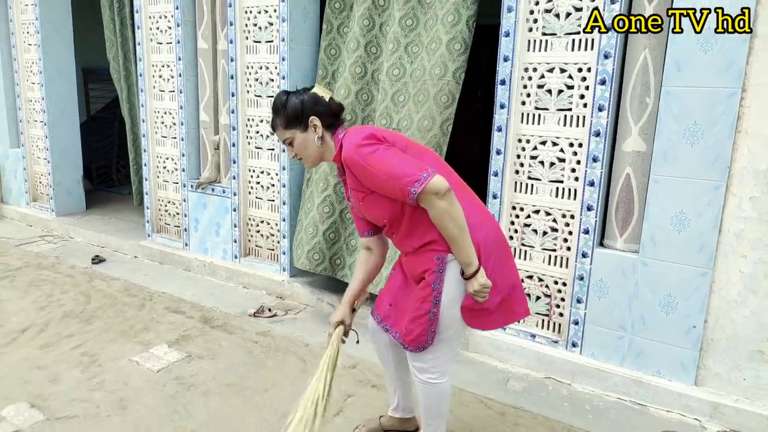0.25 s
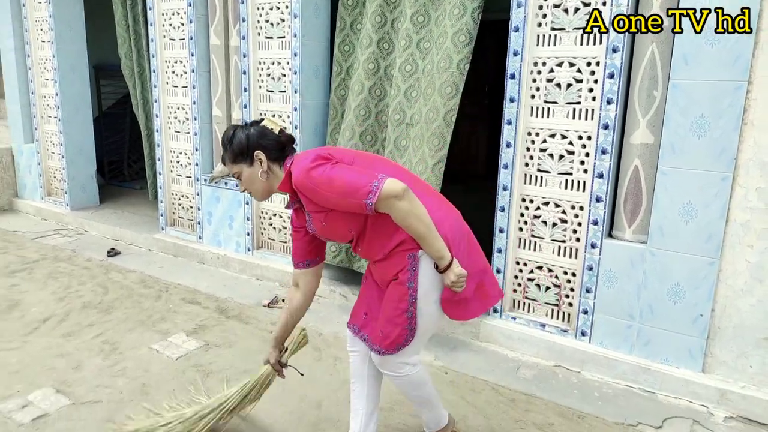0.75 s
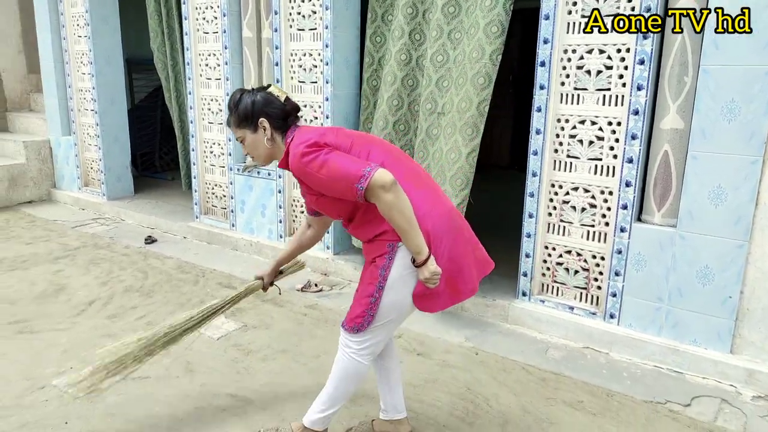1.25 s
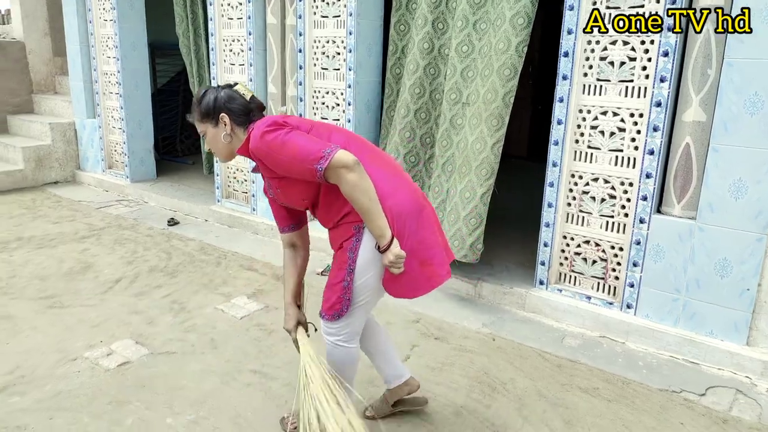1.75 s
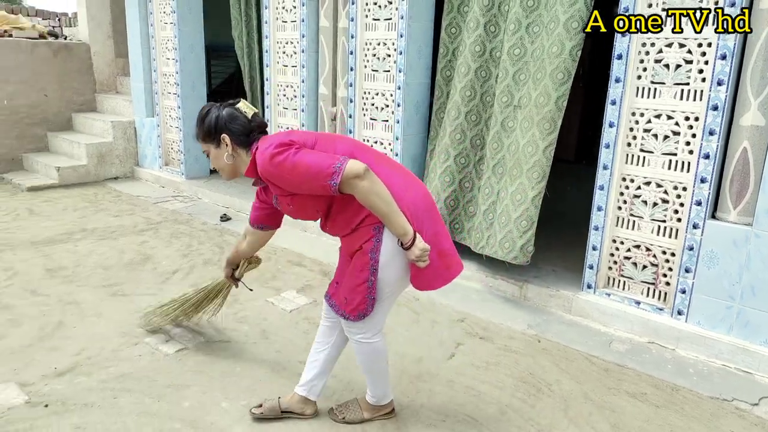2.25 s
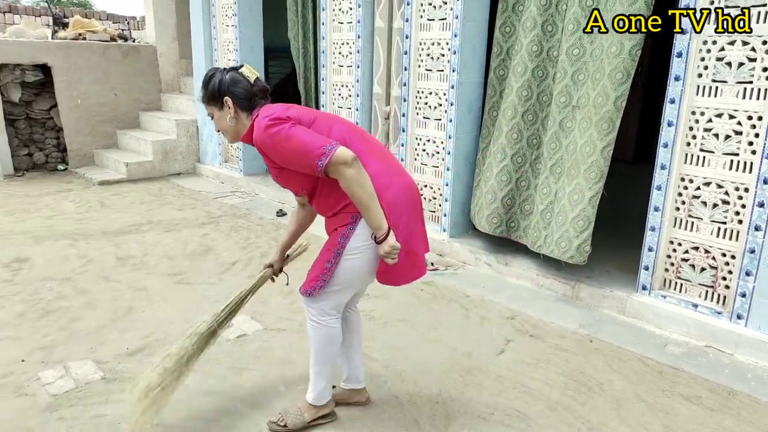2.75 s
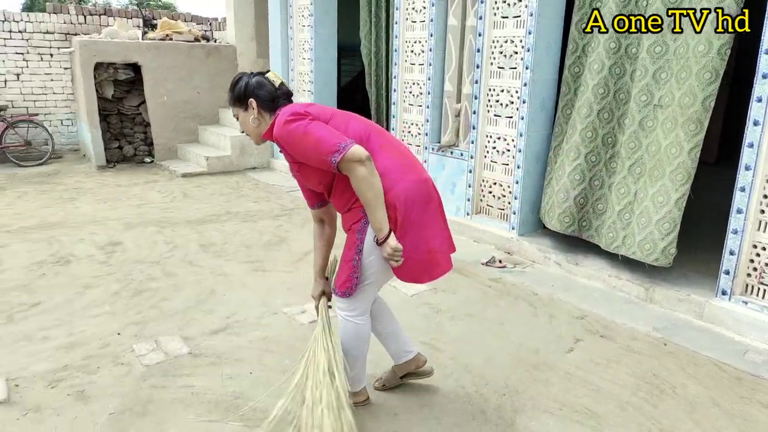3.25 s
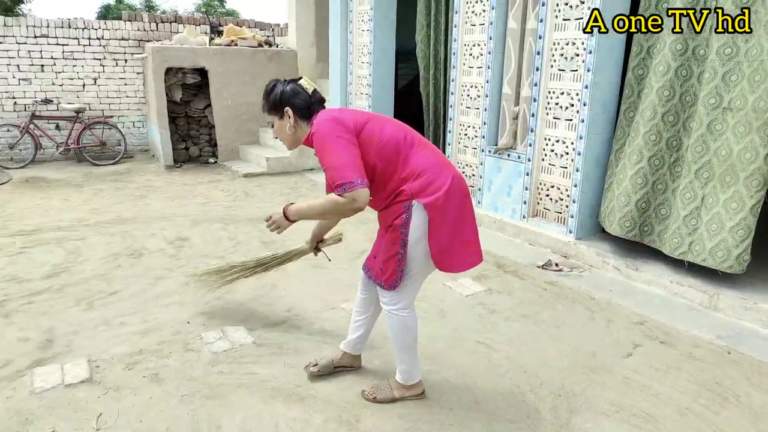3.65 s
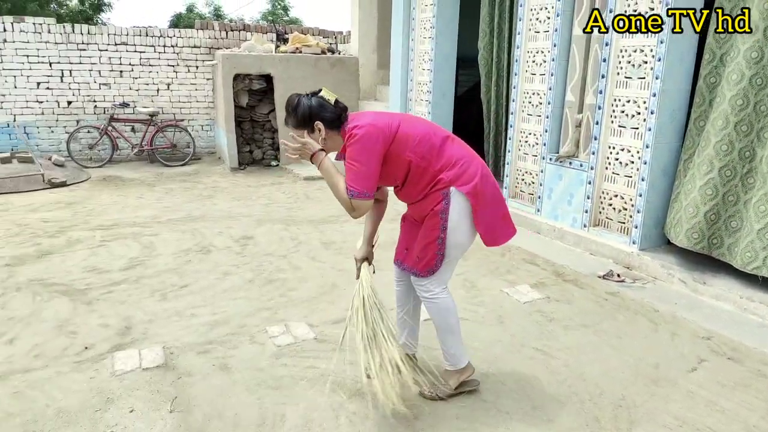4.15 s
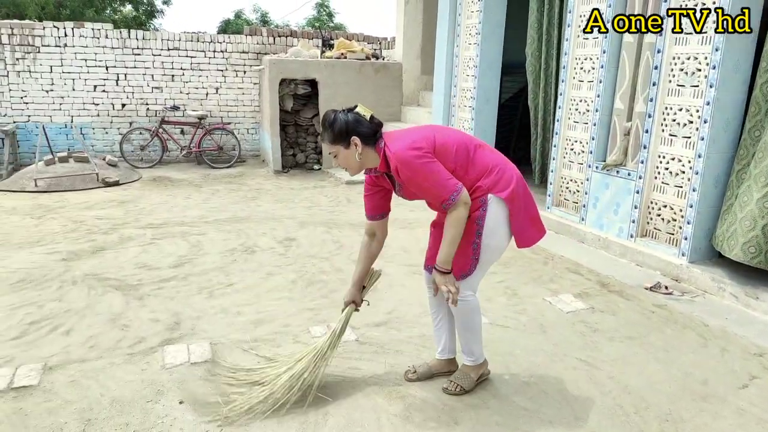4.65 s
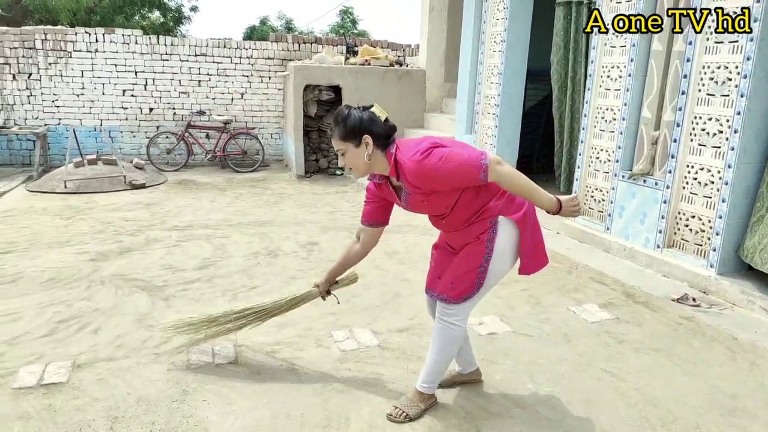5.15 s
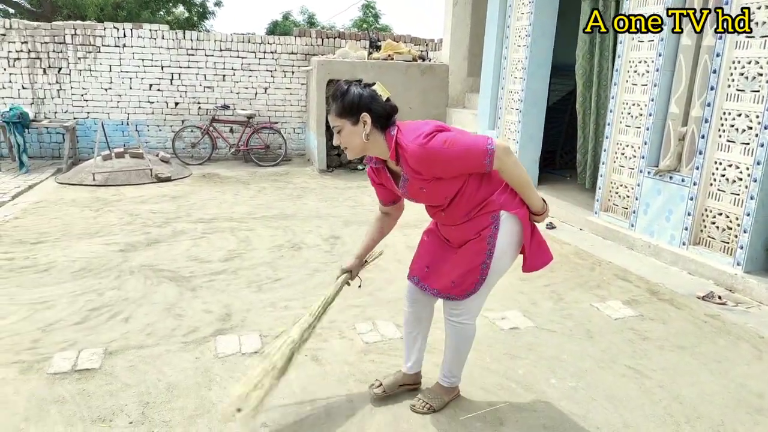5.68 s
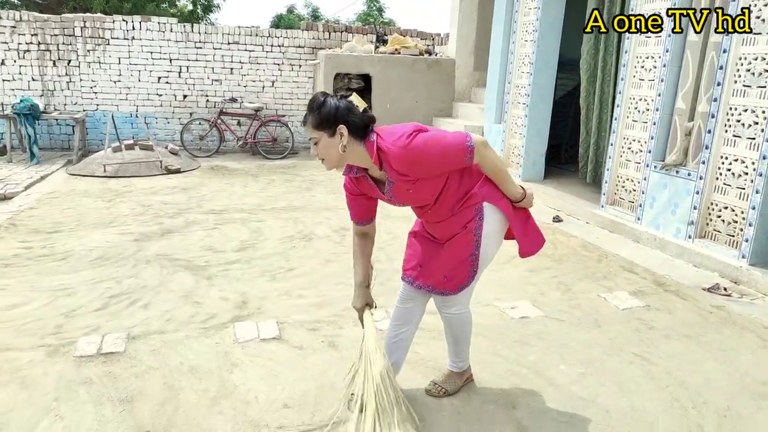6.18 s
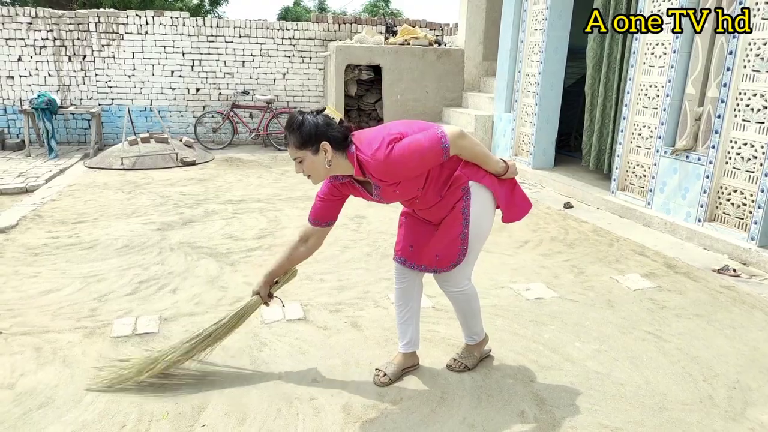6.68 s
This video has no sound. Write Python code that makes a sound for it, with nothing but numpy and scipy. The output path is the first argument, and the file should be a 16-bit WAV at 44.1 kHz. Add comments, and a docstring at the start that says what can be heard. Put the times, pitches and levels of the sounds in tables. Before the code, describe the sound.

Close outdoor sweeping with a grass-stalk broom on dusty ground: a dry, bright swish about every three quarters of a second, each swelling quickly and fading away. Small sandal taps and crisp stalk ticks fall between strokes. A low wind puff buffets the microphone at the start. Quiet yard murmur and distant hum lie beneath; faint falling whistles come later.

```python
"""A grass broom sweeps dusty earth in a walled courtyard, about one stroke every 0.77 s.
Its strokes are stalk-tip scratches and dust hiss, shaped by how fast and hard the broom moves.
Single stalks flick free as noise ticks; sandal taps and knocks are short pushes with crushed grit.
Faint falling whistles, blurred tones, sound far off over an outdoor murmur of noise and a low hum of sines.
A puff of air buffets the microphone at first, and its left port rings in the treble."""
import sys
import numpy as np
from scipy import signal
from scipy.fft import rfft, irfft, next_fast_len
from scipy.io import wavfile
from scipy.ndimage import uniform_filter1d, map_coordinates

SR = 44100
rng = np.random.default_rng(int(sys.argv[2]) if len(sys.argv) > 2 else 0)


def output_pcm(signal):
    """Save a mono or channel-first signal as 16-bit PCM at the path in sys.argv[1].

    Samples are clipped to [-1, 1] before scaling.
    """
    pcm = np.clip(np.atleast_2d(signal).T, -1, 1) * 32767
    wavfile.write(sys.argv[1], SR, np.round(pcm).astype(np.int16))


N = 305172

# broom strokes: landing t/s, swing-up time/s, time at full speed/s, level/dB, fade on lifting/(dB per s),
# weight on the stalks/dB, loose dust/dB, first skim of the tips relative to the stroke/dB
BROOM_STROKES = [(-0.15, 0.14, 0.061, -27, 96.5, 0.5, -1, -30),
                 (0.69, 0.18, 0.075, -26.5, 106, -0.5, 0.5, -28),
                 (1.515, 0.13, 0.12, -28, 130, -0.5, 1, -23.5),
                 (2.292, 0.18, 0.088, -27, 124, -0.5, 1.5, -25.5),
                 (3.053, 0.12, 0.1, -29, 101, 0, 0.5, -18), (3.798, 0.16, .12, -30, 112.5, 0.5, -0.5, -27),
                 (4.603, 0.13, 0.089, -29, 104, -0.5, -2.5, -39), (5.28, 0.12, 0.11, -31, 92, 1, -2, -21),
                 (5.979, 0.16, 0.14, -31, 119, 0.5, -2, -20), (6.743, .14, 0.078, -32, 104, 2, -3, -24)]
# light grazes of the tips outside the main push: middle t/s, half length/s, level/dB
TIP_GRAZES = [(0.235, 0.05, -46.5), (0.394, 0.038, -37.5), (0.467, 0.027, -40.5), (0.57, 0.18, -54.5),
              (2.702, 0.043, -44), (2.94, 0.035, -50.5), (3.391, 0.042, -38.5), (5.718, 0.013, -46.5),
              (6.35, 0.053, -43)]
# tone of stalks on earth: f/Hz, relative level/dB per Hz
STALK_SPECTRUM = [(150, -34), (450, -16), (900, -14.5), (1300, -8.5), (1900, -6), (2400, -9), (3200, -2.5),
                  (4200, -2), (5100, -4), (5800, -8), (6600, -0.4), (9000, 1), (11500, -4), (15000, -8.5)]
# resonances of the left microphone port: f/Hz, level over the right/dB
LEFT_PORT_RESPONSE = [(500, 0.4), (1300, 2.5), (2050, 3), (2650, -2), (3200, -1.5), (4600, 3), (6100, -1.5),
                      (7500, 10.5), (8700, 3.5), (9900, 2.5), (10900, 8), (12100, 7), (14100, 16),
                      (15300, 14.5)]
# how alike left and right are: f/Hz, likeness (1 = identical)
STEREO_LIKENESS = [(60, 0.97), (290, 0.79), (640, 0.79), (1400, 0.21), (3100, 0.33), (6500, 0)]
# outdoor background tone: f/Hz, relative level/dB per Hz
YARD_SPECTRUM = [(15, -44), (25, -39), (59, -1.5), (172, 0), (306, -6), (499, -7.5), (569, -3), (636, -8.5),
                 (1160, -11), (1240, -11), (1480, -14), (2250, -14.5), (3510, -21), (5000, -32.5),
                 (6500, -18), (11000, -120)]
# hum of a distant machine, before its waver and drift: f/Hz, rms level/dB
MACHINE_HUM = [(172.3, -64.5), (253.0, -69)]
# tone of the air churning at the microphone: f/Hz, relative level/dB per Hz
GUST_SPECTRUM = [(15, -52), (25, -21), (97, 9), (169, -13), (204, -26), (279, -8), (300, -24), (390, -49),
                 (660, -120)]
# sandal taps and small knocks, before stereo placing: t/s, push peak level/dB, pitch f/Hz
SANDAL_TAPS = [(0.239, -31, 730), (0.578, -37.8, 590), (1.883, -41, 1000), (2.257, -34, 1090),
               (2.8371, -25.5, 645), (2.9239, -31, 2130), (3.7432, -39.5, 600), (4.4296, -34, 2240),
               (4.4372, -33, 2300), (4.4805, -41, 890), (5.1336, -32.5, 1560)]
# single stalks flicking free, before trim and colouring: t/s, starting level/dB
STALK_FLICKS = [(0.2924, -27), (0.363, -24), (0.551, -35), (1.4836, -37), (1.962, -29), (2.089, -30.5),
                (2.4356, -23), (4.3998, -31), (4.5461, -37), (5.1654, -29), (5.715, -25.5), (6.3738, -23),
                (6.4368, -26.5)]
# decay of the courtyard tail: f/Hz, time to fall 60 dB/s
WALL_DECAY = [(200, 0.27), (2000, 0.48), (12000, 0.21)]
# far whistles: t/s, length/s, first f/Hz, last f/Hz, level before the swell/dB
FAR_WHISTLES = [(3.457, 0.18, 2480, 2220, -55), (3.549, .18, 2130, 1760, -50),
                (5.159, .25, 1464, 1264, -52), (5.87, 0.18, 2470, 2185, -56.5)]


def amp(db):
    """Decibels to gain."""
    return 10 ** (np.asarray(db) / 20)


def unit(x):
    """Scale to rms 1."""
    return x / np.sqrt(np.mean(x ** 2) + 1e-20)


def along(points, hz):
    """Read a curve of (Hz, value) points on a log frequency axis."""
    f, v = np.transpose(points)
    return np.interp(np.log(hz + 1), np.log(f + 1), v)


def wobble(rate):
    """A smooth random curve with rate knots a second."""
    knots = rng.standard_normal(int(N * rate / SR) + 4)
    return map_coordinates(knots, [np.arange(N) * rate / SR])


def filtered(x, response):
    """Shape x by a response given as a function of frequency."""
    size = next_fast_len(N + SR // 2)
    spectrum = rfft(x, size) * response(np.fft.rfftfreq(size, 1 / SR))
    return irfft(spectrum, size)[..., :N]


def coloured(x, spectrum):
    """Shape x by a (Hz, dB) spectrum."""
    return filtered(x, lambda hz: amp(along(spectrum, hz)))


def below(x, edge_hz):
    """Keep the part of x under a steep edge."""
    return filtered(x, lambda hz: 1 / (1 + (hz / edge_hz) ** 16))


def add(track, s, sound):
    """Mix a sound into a track at time s."""
    part = track[..., max(round(s * SR), 0):][..., :sound.shape[-1]]
    part += sound[..., :part.shape[-1]]


def patchy(x, depth_db, bins_size, frames_size):
    """Raise and dip random patches over pitch and time."""
    z = signal.stft(x, nperseg=256)[2]
    field = uniform_filter1d(rng.standard_normal(z.shape), bins_size, 1)
    field = uniform_filter1d(field, frames_size, 2)
    return signal.istft(z * amp(depth_db * unit(field)), nperseg=256)[1][:, :N]


def ports(pair):
    """Turn two unrelated signals into left and right: long waves reach both ports alike."""
    def mid_side_gains(hz):
        """A shared mid and an opposed side set the likeness at each frequency."""
        turn = np.arccos(np.clip(along(STEREO_LIKENESS, hz), -1, 1)) / 2
        return np.array([np.cos(turn), np.sin(turn)])

    mid, side = filtered(pair, mid_side_gains)
    return np.array([mid + side, mid - side])


def left_port(x):
    """The narrow sound port colours the left channel."""
    return np.array([coloured(x[0], LEFT_PORT_RESPONSE), x[1]])


def sweeping(rustle_db=-56.5, rustle_scrape_db=-4, scrape_db=-7, graze_scrape_db=-8, skim_s=0.059,
             press_db=2, press_s=0.058, press_at=0.61, bite_db=3.5, bite_s=0.16, bite_at=0.45):
    """Strength of hiss, scrape and fizz: each stroke skims, bites into the dust, bears down and lifts away."""
    t = np.arange(N) / SR
    # the lifted broom still rustles between strokes
    rustle = amp(rustle_db + wobble(4.6))
    power = (rustle * amp([[0], [rustle_scrape_db], [0]])) ** 2
    for s, rise, hold, db, fade_db_per_s, weight_db, dust_db, skim_db in BROOM_STROKES:
        age = np.maximum(t - s, 0)
        swing = np.sin(np.pi / 2 * np.minimum(age / rise, 1)) ** 2
        skim = amp(skim_db) * np.exp(-((t - s) / skim_s) ** 2)
        lift_db = fade_db_per_s * np.maximum(age - rise - hold, 0)
        hiss = np.hypot(swing, skim) * amp(db - lift_db)
        # part-way through the full-speed time the stalks bend and scrape more
        press = np.exp(-((age - rise - press_at * hold) / press_s) ** 2)
        scrape = hiss * amp(weight_db + press_db * press + scrape_db)
        # during the swing-up the landing tips throw up extra dust
        bite = np.exp(-((t - s - bite_at * rise) / bite_s) ** 2)
        fizz = hiss * amp(dust_db + bite_db * bite)
        power += np.array([hiss, scrape, fizz]) ** 2
    for s, half, db in TIP_GRAZES:
        touch = np.exp(-((t - s) / half) ** 2)
        power += (amp([[db], [db + graze_scrape_db], [db]]) * touch) ** 2
    return np.sqrt(power)


def scratches(rate, spread_db, dust_db):
    """Random slips of stalk tips, rate a second, over the smooth hiss of dust; each port hears its own."""
    slips = rng.random((2, N)) < rate / SR
    sizes = amp(spread_db * np.minimum(rng.standard_normal((2, N)), 2.5))  # no slip is extremely loud
    grains = slips * sizes * rng.choice([-1, 1], (2, N)) / np.sqrt(rate)
    return unit(grains) + amp(dust_db) * rng.standard_normal((2, N))


def broom(full_rate=8000, light_rate=1600, scrape_edge_hz=5800, fizz_edge_hz=12300,
          hiss_db=1.0, scrape_db=2.5, fizz_db=5.5, flutter_db=0.06, dust_flutter_db=1.2):
    """The tips hiss and fizz as they skim the ground; pressed down, the stalks add a lower scrape."""
    hiss, scrape, fizz = sweeping()
    rate = light_rate + full_rate * hiss / hiss.max()  # a faster stroke drags more tips over more grit
    slips = scratches(rate, spread_db=3.0, dust_db=1.0)
    rub = left_port(ports(coloured(slips, STALK_SPECTRUM)))
    low, body = below(rub, scrape_edge_hz), below(rub, fizz_edge_hz)
    # different stalks touch from moment to moment, each bundle favouring its own pitches
    stalks = unit(patchy(low, depth_db=3.0, bins_size=2, frames_size=8))
    stalks = stalks * amp(scrape_db + flutter_db * wobble(70))
    tips = unit(patchy(body - low, depth_db=2.5, bins_size=3, frames_size=16))
    tips = tips * amp(hiss_db + flutter_db * wobble(70))
    dust = unit(rub - body) * amp(fizz_db + dust_flutter_db * wobble(60))
    return scrape * stalks + hiss * tips + fizz * dust


def background(level_db=-50.5, fade_db_per_s=0.45, waver_db=1.9, drift_hz=2.16, hum_waver_db=2.0):
    """Low outdoor murmur of air and far machinery, nearly mono in the bass and never quite steady."""
    t = np.arange(N) / SR
    murmur = ports(coloured(rng.standard_normal((2, N)), YARD_SPECTRUM))
    murmur = unit(patchy(murmur, depth_db=1.24, bins_size=2, frames_size=45))
    # the murmur sinks slowly as the microphone turns across the yard
    air = murmur * amp(level_db - fade_db_per_s * t + waver_db * wobble(3.5))
    drift = drift_hz * wobble(6)
    hum = np.zeros(N)
    for hz, db in MACHINE_HUM:
        phase = 2 * np.pi * np.cumsum(hz + drift) / SR
        hum += amp(db + hum_waver_db * wobble(3.17)) * np.sin(phase)
    return air + np.sqrt(2) * hum  # a sine peaks at root two times its rms


def buffet(middle_s=0.2, half_s=0.28, churn_db=-45.5, eddy_count=8, eddies_per_s=15, eddy_hz=105,
           eddy_half_s=0.008, eddy_db=13, scatter_s=0.0092, scatter_octaves=0.22, right_db=-16):
    """A puff of air swells and passes, its eddies thumping the left port; the right port is sheltered."""
    t = np.arange(N) / SR
    puff = amp(churn_db) * np.exp(-((t - middle_s) / half_s) ** 4)
    thumps, u = np.zeros(N), np.arange(-SR // 40, SR // 40) / SR
    for k, (late, pitch, phase) in enumerate(rng.standard_normal((eddy_count, 3)), 1):
        hz = eddy_hz * 2 ** (scatter_octaves * pitch)
        thump = np.cos(2 * np.pi * (hz * u + phase)) * np.exp(-(u / eddy_half_s) ** 2)
        add(thumps, k / eddies_per_s + scatter_s * late + u[0], thump)
    churn = unit(coloured(rng.standard_normal((2, N)), GUST_SPECTRUM))
    return puff * (churn + amp(eddy_db) * thumps) * amp([[0], [right_db]])


def taps(cycles=0.45, grit_db=-17, grit_t60_s=0.062, grit_octaves=0.8):
    """Earth does not ring: each contact is one short push and rebound, then a little crushed grit."""
    track, t = np.zeros(N), np.arange(-SR // 100, SR // 8) / SR
    freqs = np.fft.rfftfreq(len(t), 1 / SR) + 1
    for s, db, hz in SANDAL_TAPS:
        push = np.cos(2 * np.pi * hz * t) / (1 + (t * hz / cycles) ** 2) ** 1.5
        colour = np.exp(-(np.log2(freqs / hz) / grit_octaves) ** 2 / 2)  # a harder contact crushes brighter
        grit = unit(irfft(rfft(rng.standard_normal(len(t))) * colour, len(t)))
        grit_fade = (t > 0) * amp(grit_db - 60 * np.abs(t) / grit_t60_s)
        add(track, s + t[0], amp(db) * (push + grit_fade * grit))
    return track


def flicks(t60_s=0.0089, trim_db=-2):
    """A bent stalk springs free with a dry tick, a fast-dying burst of noise."""
    track, t = np.zeros((2, N)), np.arange(SR // 20) / SR
    for s, db in STALK_FLICKS:
        add(track, s, amp(db + trim_db - 60 * t / t60_s) * rng.standard_normal((2, len(t))))
    return left_port(coloured(track, STALK_SPECTRUM))


def courtyard(x):
    """The walls answer with a short tail, different at each port."""
    hz, t, z = signal.stft(rng.standard_normal((2, SR // 2)), SR, nperseg=256)
    fade = amp(-60 * t / along(WALL_DECAY, hz)[:, None])
    tail = signal.istft(z * fade, SR, nperseg=256)[1]
    return signal.fftconvolve(x, tail / np.linalg.norm(tail[0]), axes=1)[:, :N]


def whistles(blur_hz=55):
    """Faint falling notes, perhaps a distant bird, blurred by the way they travel."""
    track, t = np.zeros((2, N)), np.arange(N) / SR
    for s, length, first_hz, last_hz, db in FAR_WHISTLES:
        live = (t > s) & (t < s + length)
        u = (t[live] - s) / length
        phase = 2 * np.pi * np.cumsum(first_hz + (last_hz - first_hz) * u) / SR
        # slow noise on both quadratures smears the pure tone into a narrow band
        noise = rng.standard_normal((2, 2, len(u)))
        blur = signal.lfilter([1], [1, -np.exp(-2 * np.pi * blur_hz / SR)], noise)
        note = unit(blur[0] * np.cos(phase) + blur[1] * np.sin(phase))
        track[:, live] += amp(db) * np.sin(np.pi * u) * note
    return track


def scene():
    """Broom and feet close by, the yard around them; sharp contacts draw a faint answer from the walls."""
    contacts = taps() * amp([[1], [-1]]) + flicks()  # taps lean left
    answer = courtyard(amp(-4.0) * contacts)
    return broom() + background() + buffet() + contacts + answer + whistles()


def record(dry, low_cut_hz=42, top_hz=15550):
    """The recorder thins the deepest bass and keeps nothing above its band limit."""
    return filtered(dry, lambda hz: (hz < top_hz) * hz ** 3 / np.sqrt(hz ** 6 + low_cut_hz ** 6))


dry = scene()
out = record(dry)
output_pcm(out)
```